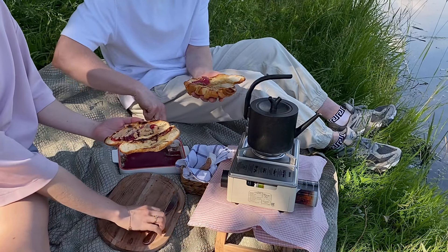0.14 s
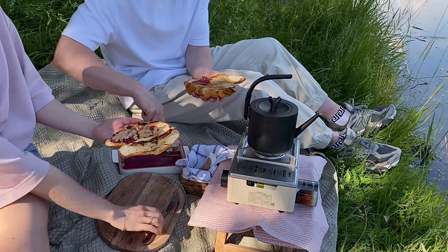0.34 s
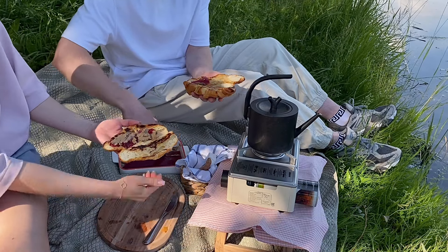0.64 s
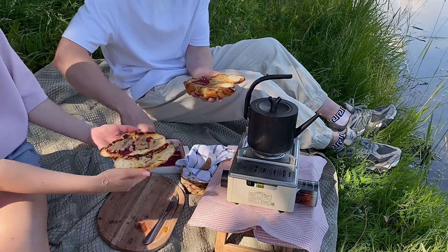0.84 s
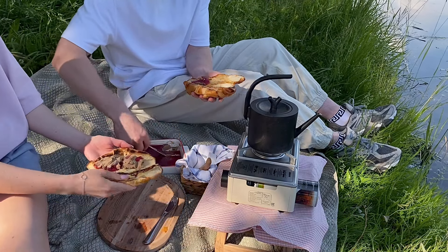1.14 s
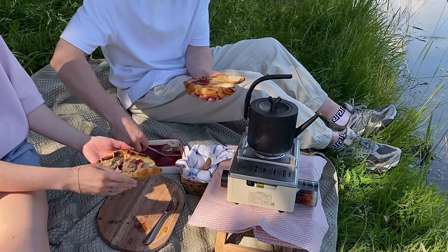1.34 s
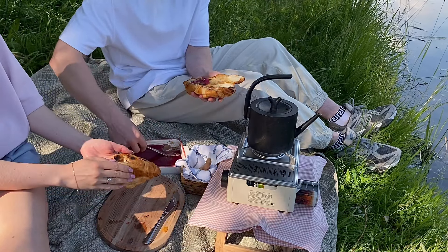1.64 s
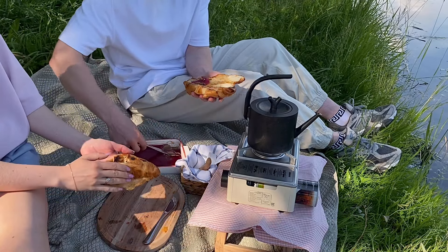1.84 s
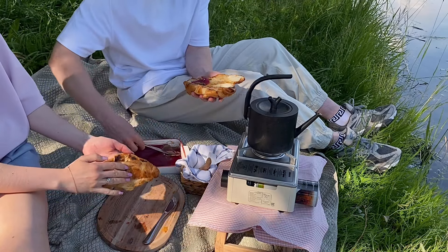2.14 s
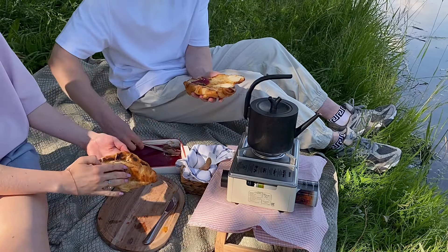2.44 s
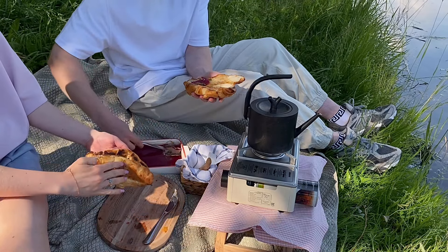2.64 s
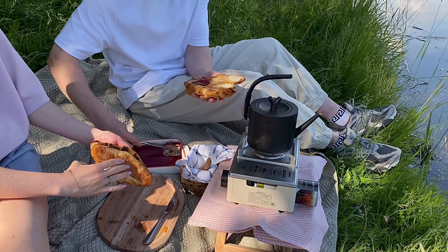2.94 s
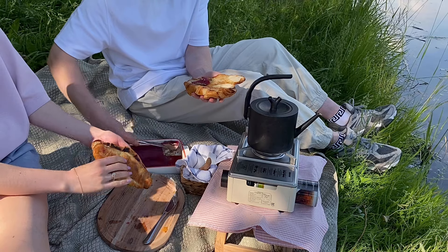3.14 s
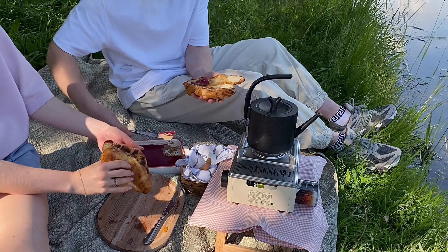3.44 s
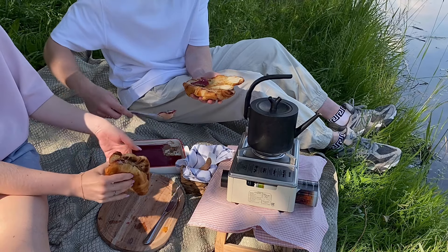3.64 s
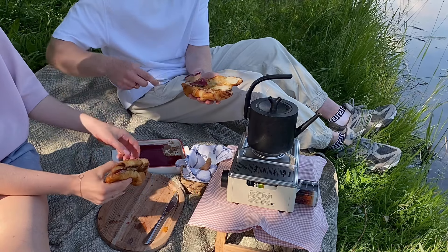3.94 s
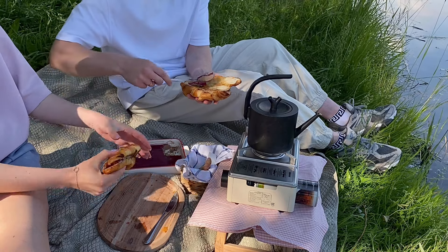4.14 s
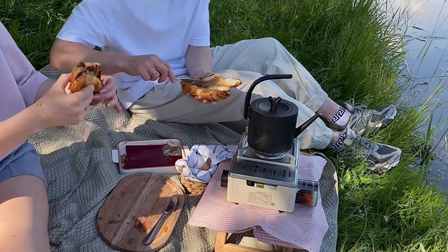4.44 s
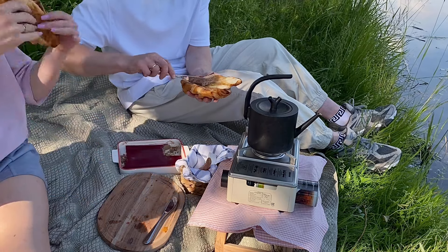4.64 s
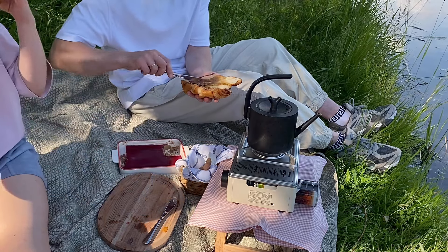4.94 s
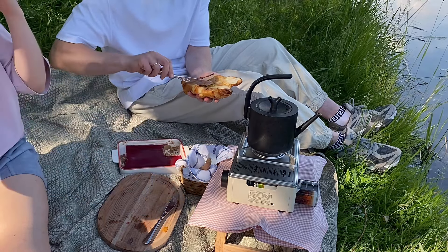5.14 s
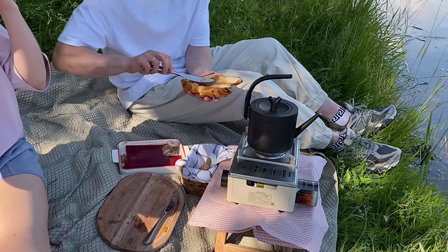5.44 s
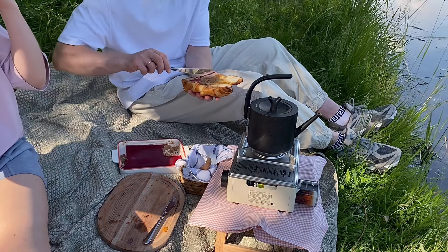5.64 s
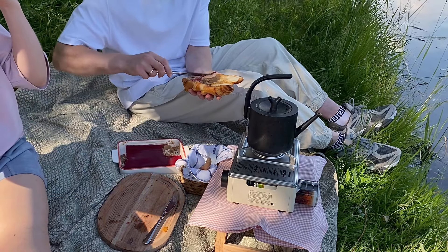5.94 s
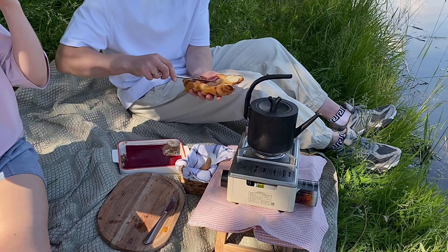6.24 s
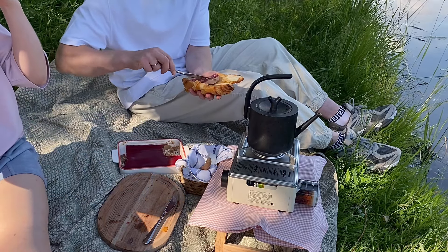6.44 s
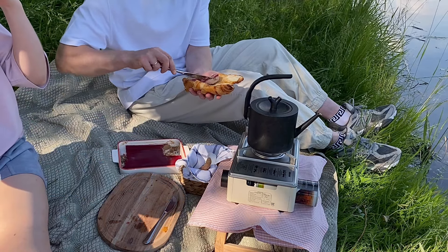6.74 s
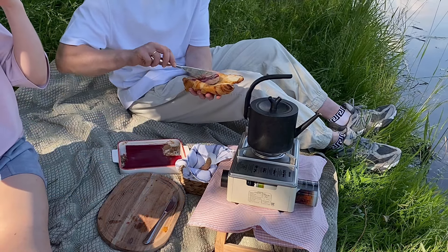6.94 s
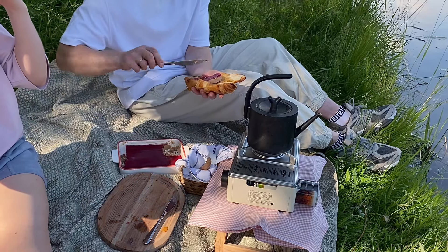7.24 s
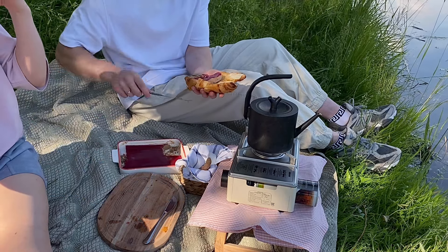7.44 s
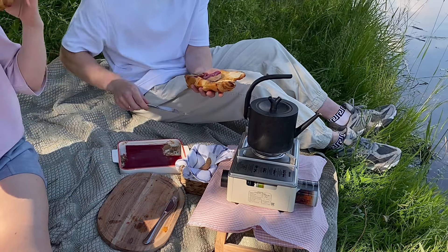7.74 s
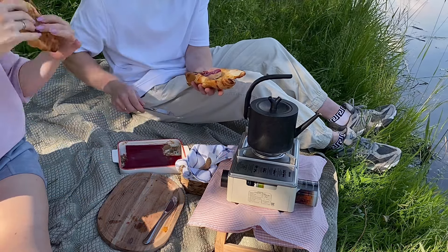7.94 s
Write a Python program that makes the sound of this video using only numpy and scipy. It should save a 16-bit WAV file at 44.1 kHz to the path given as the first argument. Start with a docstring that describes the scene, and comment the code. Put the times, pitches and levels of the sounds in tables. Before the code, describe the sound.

Rasping bird churrs speed up and swell into a sharp dry rattle, then cut off, leaving soft outdoor rumble, far engine hum and faint birds.

```python
"""By a lake, an outdoor rumble, a fine high hiss and a far engine that swells and fades run throughout.
Two dry picnic knocks open it, as a thrush-like bird begins to scold: hoarse churrs speed up into a hard
rattle that stops at once. Each note is two fluttering whistles from the two sides of the syrinx plus a
pulsed rasp, blended by hoarseness; grass and trees scatter it. Soft bumps fall from mid-rattle on; distant
birds glide and chirp late on, and one more small knock comes after the rattle."""
import sys
import numpy as np
from scipy import signal
from scipy.fft import rfft, irfft, next_fast_len
from scipy.io import wavfile
from scipy.ndimage import uniform_filter1d

SR = 44100
rng = np.random.default_rng(int(sys.argv[2]) if len(sys.argv) > 2 else 0)


def transcribe(u):
    """Save the signal u as a 16-bit wav file named by the first command-line argument.

    u: samples, shape (n,) or (channels, n), limited to [-1, 1]; the rate is SR.
    q: integer samples, one column per channel.
    """
    v = np.clip(np.atleast_2d(u).T, -1, 1)
    q = np.round(v * 32767).astype(np.int16)
    wavfile.write(sys.argv[1], SR, q)


N = 356769  # samples in the scene


def gain_of(db):
    """Decibels to amplitude."""
    return 10 ** (np.asarray(db) / 20)


def evened(x):
    """Scales to rms 1."""
    return x / np.sqrt(np.mean(x ** 2) + 1e-20)


def at(rows, x):
    """Reads every column of a curve at x, the first column being the axis."""
    xs, *columns = np.transpose(rows)
    return [np.interp(x, xs, column) for column in columns]


def follow(rows):
    """Reads the columns of a curve over time, sample by sample."""
    return at(rows, np.arange(N) / SR)


def read(points, hz):
    """Reads a spectrum on a log-frequency axis."""
    point_hz, value = np.transpose(points)
    return np.interp(np.log(hz + 1), np.log(point_hz + 1), value)


def coloured(x, points):
    """Shapes a sound's spectrum by (frequency_hz, gain_db) points."""
    length = x.shape[-1]
    size = next_fast_len(length, True)
    gain = gain_of(read(points, np.fft.rfftfreq(size, 1 / SR)))
    return irfft(rfft(x, size) * gain, size)[..., :length]


def wander(size, hz):
    """Smooth random drift of rms about 1: noise rolled off steeply above hz."""
    f = np.fft.rfftfreq(size + 4096, 1 / SR)
    spectrum = rfft(rng.standard_normal(size + 4096)) / (1 + (f / hz) ** 4)
    return evened(irfft(spectrum))[:size]


def add(mix, start_s, sound):
    """Mixes a sound in at a start time, cut off at the end of the mix."""
    part = mix[max(round(start_s * SR), 0):][:len(sound)]
    part += sound[:len(part)]


def diffuse(points):
    """Noise from all around: alike in both ears in the bass, less so in most of the treble."""
    # how alike the air sounds left and right: frequency_hz, likeness (0-1)
    likeness = [(130, 1), (290, 1), (640, 0.78), (1400, 0.42), (3100, 0.8), (7000, 0), (10000, 0.53),
                (13000, 0)]
    size = 2 * next_fast_len(N // 2 + 1, True)
    left, other = rfft(rng.standard_normal((2, size)))
    same = np.clip(read(likeness, np.fft.rfftfreq(size, 1 / SR)), -1, 1)
    right = same * left + np.sqrt(1 - same ** 2) * other
    return evened(coloured(irfft(np.array([left, right]))[:, :N], points))


def open_air(rumble_db=-42, hiss_db=-39.5, gust_db=1.5, gust_hz=4):
    """Wide shaped noise: a rumble whose bass rises and falls, under a fine high hiss."""
    # spectra of the open air: frequency_hz, relative_level_db
    rumble = [(15, -28), (30, -7), (50, -1.5), (72, 0), (100, -6), (125, -8.5), (175, -10.5), (300, -19),
              (480, -22), (950, -20.5), (1400, -23.5), (2400, -31.5), (6000, -28), (16000, -44)]
    high_hiss = [(2500, -19), (4150, -19), (4450, 1), (4780, -1), (5050, -18), (5500, -12), (6000, -38),
                 (6900, -7), (8300, -14), (9100, 0), (9750, -1), (11100, -10), (13500, -3.5), (15700, -22)]
    # slow drive of the rumble's bass: time_s, swell_db
    swell = [(0, -4), (1.4, .5), (2, -2.5), (3.1, 1.5), (3.8, 0.5), (4.35, 0.5), (4.9, -4.5), (5.6, 2.5),
             (6.4, -3), (8.09, 0)]
    air = gain_of(rumble_db) * diffuse(rumble)
    bass = coloured(air, [(80, 3.0), (160, -30), (400, -80)])
    swell_db, = follow(swell)
    # adds or takes away bass around its steady level
    air = air + bass * (gain_of(swell_db + gust_db * wander(N, gust_hz)) - 1)
    return air + gain_of(hiss_db + .5 * wander(N, 4.1)) * diffuse(high_hiss)


def far_engine(waver_hz=1.393, flicker_db=1.5):
    """Sine tones for the firing rate, low hum and thin drone that carry this far; all waver on the way."""
    # the firing tone swells and fades: time_s, firing_hz, level_db
    engine = [(.15, 95.8, -57), (.4, 94.7, -45.5), (1.5, 94.4, -45.5), (2.1, 95.2, -52.5),
              (2.41, 91.7, -41.5), (3.05, 93.6, -40.5), (4.0, 96, -52), (4.22, 89, -39.5),
              (4.55, 91.5, -42), (5.1, 92, -41), (5.65, 94, -46), (6.0, 93.4, -44.5), (6.47, 95.4, -46.5),
              (7.2, 95.4, -55), (7.42, 92.5, -42), (8.09, 93, -41)]
    # a thin drone that sinks as the engine passes: time_s, pitch_hz, level_db
    drone = [(0, 320.6, -65.5), (3.0, 283, -62.5), (5.6, 258.5, -64), (6.5, 246, -76)]
    # weaker low tones with no set course: pitch_hz, level_db
    engine_hum = [(51, -55.5), (71, -50.5)]
    out = np.zeros(N)
    for hz, db in [follow(engine), follow(drone), *engine_hum]:
        turns = np.cumsum(hz + waver_hz * wander(N, 6.6)) / SR
        tone = np.sqrt(2) * np.sin(2 * np.pi * turns)
        out += gain_of(db + flicker_db * wander(N, 6.9)) * tone
    return out


def picnic():
    """Dry knocks of handled things are decaying noise bands; dull bumps on the blanket are low sine thuds."""
    # start_s, level_db (at the onset), centre_hz, width_octaves, decay_s
    knocks = [(.02, -36.5, 1190, 1.0, 0.02), (.041, -40.5, 1310, 1.0, 0.018),
              (6.891, -42, 9900, .6, 0.0028)]
    # start_s, level_db (envelope peak), pitch_hz, decay_s (the peak comes at half of this)
    bumps = [(4.21, -31.5, 64, 0.028), (4.43, -29, 66.2, 0.029), (7.07, -33, 66.6, 0.024),
             (7.609, -26.5, 110, 0.011)]
    out, t = np.zeros(N), np.arange(8192) / SR
    octaves = np.log2(np.fft.rfftfreq(len(t), 1 / SR) + 1)
    for start_s, db, hz, width, decay in knocks:
        band = np.exp(-((octaves - np.log2(hz)) / width) ** 2 / 2)
        burst = evened(irfft(rfft(rng.standard_normal(len(t))) * band))
        add(out, start_s, gain_of(db) * burst * np.exp(-t / decay))
    for start_s, db, hz, decay in bumps:
        envelope = 2 * t / decay * np.exp(1 - 2 * t / decay)
        add(out, start_s, gain_of(db) * np.sin(2 * np.pi * hz * t) * envelope)
    return out


def voicing(s, level_db, stray=0.01034):
    """The voice at time s: hoarseness shares level between whistles and rasp and sets their interval."""
    # the voice clears as the bird grows excited: time_s, hoarseness (0 clear, 1 hoarse)
    hoarseness = [(0, 0.73), (.3, 1.05), (1.41, 0.91), (1.75, 0.63), (2.22, 0.83), (2.35, 0.63),
                  (2.56, 0.49), (2.72, 0.84), (3.06, .63), (3.15, 0.28), (3.34, 0.27), (3.55, 0.12),
                  (5.75, 0.07)]
    # central pitch of the lower voice: time_s, pitch_hz
    pitch = [(0, 3503), (1.05, 3745), (1.7, 3637), (2.7, 3634), (3.24, 3865), (3.55, 3576), (4.35, 3622),
             (5.02, 3753), (5.3, 3578), (5.75, 3610)]
    # hoarseness, lower_db, upper_db, rasp_db, interval (upper pitch over lower pitch)
    blend = [(.1, -4.5, -2, -10, 1.435), (.3, -5.5, -2.5, -4.5, 1.44), (.53, -9, 0.5, -8, 1.35),
             (.75, -7.5, -7, -2.5, 1.38), (.97, -11, -9.5, -1, 1.42)]
    # changing strength and brightness of the rasp: time_s, rasp_trim_db, treble_db
    rasp_level = [(.2, -2.5, -2), (.65, 2, 4), (1.2, -2, 3), (1.7, 0, 0.5), (2.9, 2, -2.5),
                  (3.15, 0.5, 2.5), (4.93, 0.5, 2.5), (5.3, -3, -1.5), (5.75, -4.5, -2)]
    hoarse, = at(hoarseness, s)
    hz, = at(pitch, s)
    low_db, high_db, rasp_db, interval = at(blend, hoarse)
    rasp_trim_db, top_db = at(rasp_level, s)
    low_hz, high_hz = hz * np.array([1, interval]) * (1 + stray * rng.standard_normal(2))
    rasp_db = level_db + rasp_db + rasp_trim_db
    return level_db + low_db, level_db + high_db, rasp_db, low_hz, high_hz, hoarse, top_db


def note(length, low_db, high_db, rasp_db, low_hz, high_hz, hoarse, top_db, fall=0.328, upper_lead=0.45,
         pip_db=6, under_db=-18.5, growl_db=-10, strain_db=4):
    """One note: two voices flutter out of step, then slide down as the rasp takes over."""
    # strengths through a note: share_of_length, clean_voices, clean_rasp, hoarse_voices, hoarse_rasp
    shape = [(0, .9, .25, .35, .35), (.2, 1, .4, .7, .65), (.5, 1.1, .7, .95, .95), (.72, 1.1, 1, 1.05, 1),
             (.9, .85, .9, .8, .85), (1.02, .25, .55, .2, .4), (1.16, 0, 0, 0, 0)]
    # spectrum of the rasp: frequency_hz, relative_level_db
    rasp_colour = [(900, -29.5), (1450, -14), (1800, -7), (2250, -15), (2700, -10), (4200, -1.5), (5400, 7),
                   (6150, -4), (6900, -0.5), (9000, -3), (10400, -5.5), (11300, -11), (13000, -10.5),
                   (16000, -27)]
    flutter_hz, flutter_depth = 146, .13
    t = np.arange(0, length * shape[-1][0], 1 / SR)
    u, hoarse = t / length, np.clip(hoarse, 0, 1)
    half_hoarse = 4 * hoarse * (1 - hoarse)  # greatest midway between clear and hoarse
    beat = t * flutter_hz * (1 + .02 * rng.standard_normal())

    # a full churr holds its pitch; sharper notes flutter and drop at the end
    agility, pip_hz = 1 - hoarse ** 5, .92 * high_hz
    slide = 1 - agility * fall * np.clip((u - .62 - 0.06 * hoarse) / 0.429, 0, 1.15)
    unrest = .006 + .03 * half_hoarse + .012 * np.clip(u, 0, 1) ** 3
    low_flutter = flutter_depth * (2 / np.pi - abs(np.sin(np.pi * beat)))
    high_flutter = .045 * agility * np.cos(2 * np.pi * (beat + upper_lead))
    low_unrest = (unrest + 0.048 * hoarse ** 2) * wander(len(t), 820)
    high_unrest = (unrest + 0.0098 * hoarse) * wander(len(t), 900)
    low_hz = low_hz * slide * (1 + low_flutter + low_unrest)
    high_hz = high_hz * slide * (1 + high_flutter + high_unrest)
    low, high = 2 * np.pi * np.cumsum([low_hz, high_hz], axis=1) / SR

    # clean notes start near full strength; hoarse ones swell and beat in pulses
    share, *strengths = np.transpose(shape)
    clean, clean_rasp, rough, rough_rasp = (np.interp(u, share, s) for s in strengths)
    pulses = 1 + .28 * np.cos(2 * np.pi * (beat - .3))

    # half-hoarse notes open with a short pip and a catch, and their upper voice rings out as it falls
    catch = min(1.2 * half_hoarse ** 2, 1)
    onset = np.clip(t / .0008, 0, 1) * (1 - .75 * catch * np.exp(-(t / .0065) ** 6))
    pip_envelope = catch * np.exp(-((t - .002) / .0016) ** 2)
    pip = gain_of(pip_db) * pip_envelope * np.sin(2 * np.pi * pip_hz * t)
    sweep = gain_of(catch * (9 * np.exp(-((u - .82) / .12) ** 2) - 4))
    body = evened(onset * ((1 - hoarse) * clean + hoarse * rough * pulses))

    lower = gain_of(low_db) * np.sin(low) * np.interp(u, [.6, .9], [1.1, .5])
    # in a churr the upper voice doubles its period
    growl = gain_of(growl_db) * hoarse ** 4 * np.sin(high / 2)
    upper = gain_of(high_db - 1.5) * ((np.sin(high) * sweep + growl) * body + pip)
    # a weak undertone and the overtones of the coupled voices, all of which grow when the bird strains
    under = gain_of(under_db + strain_db * catch) * np.sin(low / 2)
    octave = gain_of(-33 + 31.0 * catch) * np.sin(2 * low)
    sum_tone = gain_of(-15.5 + 4 * catch) * np.sin(high + low)
    partials = gain_of(low_db) * (under + octave + sum_tone) * np.interp(u, [.7, 1], [1, .3])

    hiss = coloured(rng.standard_normal(len(t)), rasp_colour)
    hiss = coloured(hiss, [(7500, 0), (12000, top_db)])
    rasp_strength = (1 - hoarse) * clean_rasp + hoarse * rough_rasp
    rasp = evened(hiss * onset * rasp_strength * pulses)
    return np.sqrt(2) * ((lower + partials) * body + upper) + gain_of(rasp_db + 1.5) * rasp


def ground_bounce(x, strength=0.21, delay_s=.0009):
    """Adds a coloured reflection off the ground, its delay drawn anew for each note as the bird moves."""
    shift = max(round(delay_s * rng.uniform(0.67, 0.87) * SR), 1)
    direct = np.pad(x, (0, shift))
    bounce = np.pad(coloured(x, [(4500, -17.5), (7500, 2.5)]), (shift, 0))
    return (direct + strength * bounce) / np.hypot(1, strength / 2)


def surroundings(x, echo_s=0.14, echo_db=-19):
    """Random sparse taps make dense early scatter from the grass, then a blurred echo from far trees."""
    # spectrum of the scatter: frequency_hz, relative_level_db
    scatter = [(1800, -7), (3300, -6.5), (4300, -3.5), (5300, 0.5), (6100, 4.5), (7000, 1), (12000, 0.5)]
    # time for the scatter to fall 60 dB: frequency_hz, t60_s
    scatter_t60 = [(1800, 0.29), (3400, 0.13), (5200, 0.17), (12000, 0.26)]
    size = SR * 3 // 5
    taps = rng.standard_normal((2, size)) * (rng.random((2, size)) < .15)
    hz, t, z = signal.stft(taps, SR, nperseg=128)
    t60 = np.maximum(read(scatter_t60, hz), .03)[:, None]
    decay = gain_of(read(scatter, hz)[:, None] - 60 * t / t60)
    z = z * decay * np.sqrt(np.log(1e6) / t60 / SR)  # evens out the energy of short and long decays
    t = np.arange(size) / SR
    tail = signal.istft(z, SR, nperseg=128)[1][:, :size] / taps.std()
    tail = tail * np.clip((t - .002) / 0.0014, 0, 1)
    echo = coloured(taps, [(3000, -19), (5200, -5), (7000, -0.5), (12000, -48)])
    echo = echo * np.exp(-((t - echo_s - .01) / 0.043) ** 2)
    tail = tail + gain_of(echo_db) * echo / np.linalg.norm(echo[0])
    return signal.oaconvolve(x[None], tail, axes=1)[:, :N]


def scolding_bird(right_lag_s=.000011, count=5):
    """Places the notes left to right by level and a tiny lag; scatters take turns as the bird moves."""
    # scolding notes: start_s, length_s (nominal; fades just past it), level_db (before the voice blend)
    notes = [(.046, 0.036, -32.5), (.133, 0.039, -32), (.249, 0.056, -31.5), (.38, 0.066, -30),
             (.528, 0.058, -32), (.659, 0.054, -33.5), (.788, 0.053, -31.5), (.922, 0.059, -33),
             (1.054, 0.056, -30.5), (1.206, 0.046, -31), (1.406, .051, -30), (1.659, 0.036, -30.5),
             (1.765, .037, -26), (1.888, 0.036, -26.5), (2.0, .036, -27), (2.125, 0.036, -28),
             (2.228, .036, -28), (2.329, 0.035, -25), (2.4475, .03, -23.5), (2.558, 0.031, -22.5),
             (2.718, .036, -29), (2.824, 0.029, -27), (2.93, 0.036, -26), (3.059, 0.031, -23.1),
             (3.151, 0.033, -20.1), (3.244, 0.031, -20), (3.3395, 0.033, -18.5), (3.442, 0.028, -16.5),
             (3.546, .028, -17), (3.639, 0.025, -16.5), (3.734, .03, -17), (3.831, .026, -16.5),
             (3.9335, 0.026, -16.5), (4.03, 0.024, -16), (4.139, .025, -16.5), (4.239, 0.025, -17),
             (4.337, .024, -16.1), (4.444, .029, -18), (4.539, 0.024, -16.5), (4.6595, .024, -17.2),
             (4.756, 0.023, -16), (4.843, 0.025, -16), (4.927, .027, -17), (5.023, .027, -18),
             (5.1125, 0.026, -17), (5.207, 0.028, -18), (5.305, 0.023, -17.6), (5.403, .028, -19),
             (5.5115, .026, -18), (5.624, 0.026, -18.4), (5.732, .026, -19)]
    # where the bird is heard: time_s, left_minus_right_db
    bearing = [(0, -0.5), (1.5, 1), (2.5, -2), (3.4, -4.5), (4.3, -4.5), (5.8, -6)]
    places = np.zeros((count, N))
    for k, (start_s, length, level_db) in enumerate(notes):
        sound = note(length, *voicing(start_s, level_db))
        add(places[k % count], start_s, ground_bounce(sound))
    dry = places.sum(0)
    pan_db, = follow(bearing)
    lag = np.exp(-2j * np.pi * np.fft.rfftfreq(N, 1 / SR) * right_lag_s)
    late = irfft(rfft(dry) * lag, N)
    sides = gain_of([pan_db / 2, -pan_db / 2])
    direct = np.array([dry, late]) * sides / np.sqrt((sides ** 2).mean(0))
    return direct + sum(surroundings(p) for p in places)


def chirp_run(count=7):
    """A far bird's evenly spaced like chirps, each a short fall in pitch, as rows like the distant calls."""
    start_s, gap_s, length_s = 6.512, .0742, 0.0339
    from_hz, to_hz, level_db = 3830, 3500, -48
    return [(start_s + k * gap_s, length_s, from_hz, to_hz, level_db) for k in range(count)]


def far_birds(wet_db=3, direct_db=-7, waver=0.01877):
    """Faint gliding, wavering sine calls, half lost in their own scatter."""
    # calls and thin whistles: start_s, length_s, start_hz, end_hz, level_db (before the distance mix)
    far_calls = [(4.983, 0.21, 579, 569, -52), (5.246, .21, 577, 575, -58.5),
                 (7.066, 0.68, 4580, 4640, -55), (7.36, .07, 3610, 2610, -53), (7.44, .12, 717, 694, -53.5),
                 (7.848, 0.24, 4770, 4640, -52), (7.91, .11, 4430, 2200, -50.5)]
    dry = np.zeros(N)
    for start_s, length, start_hz, end_hz, db in [*far_calls, *chirp_run()]:
        size = int(length * SR)
        hz = np.geomspace(start_hz, end_hz, size) * (1 + waver * wander(size, 337))
        tone = np.sin(2 * np.pi * np.cumsum(hz) / SR)
        add(dry, start_s, gain_of(db) * evened(tone * signal.windows.tukey(size, .5)))
    # far sounds arrive mostly scattered
    return gain_of(direct_db) * dry + gain_of(wet_db) * surroundings(dry)


def scene():
    """The bird over everything else by the lake."""
    return open_air() + far_engine() + picnic() + scolding_bird() + far_birds()


def record(dry, limit_db=-16.5, squeeze=1.0, edge_hz=15750):
    """A quick limiter flattens the loudest moments, then a low-pass takes off the top treble."""
    power = uniform_filter1d((dry ** 2).mean(0), size=88)
    over_db = np.maximum(10 * np.log10(abs(power) + 1e-12) - limit_db, 0)
    cut_db = np.clip(squeeze, 0, 1) * uniform_filter1d(over_db, size=44)
    held = dry / gain_of(cut_db)
    low_pass = signal.firwin(511, edge_hz, window=("kaiser", 9), fs=SR)
    return signal.oaconvolve(held, low_pass[None], "same")


dry = scene()
out = record(dry)
transcribe(out)
```